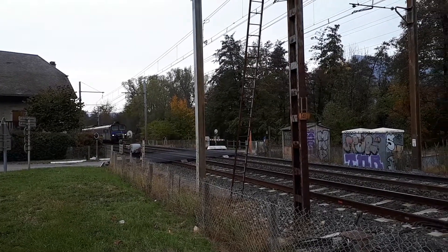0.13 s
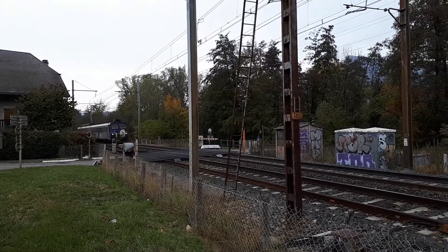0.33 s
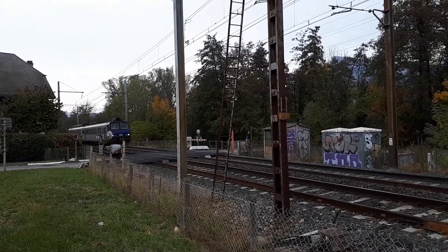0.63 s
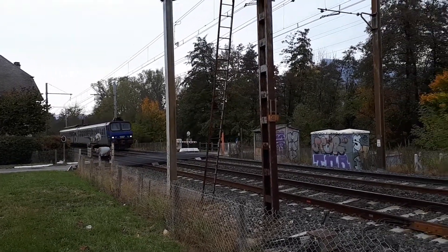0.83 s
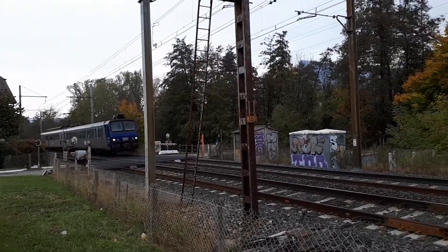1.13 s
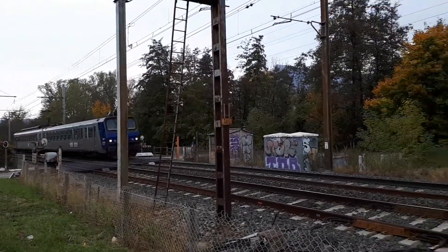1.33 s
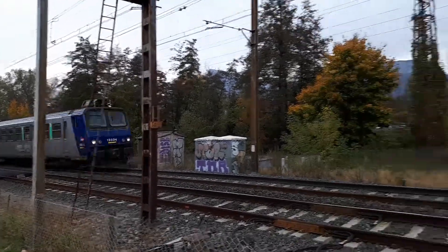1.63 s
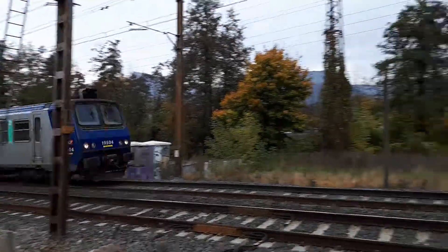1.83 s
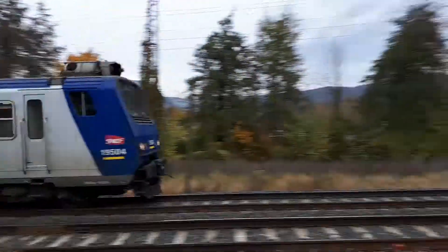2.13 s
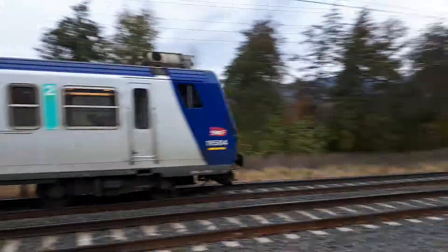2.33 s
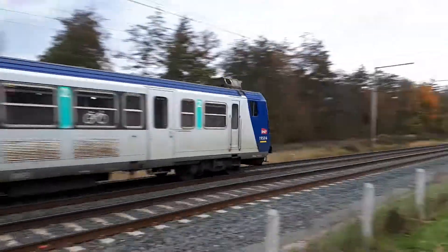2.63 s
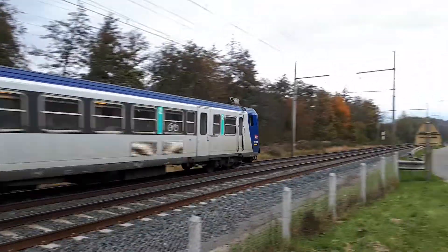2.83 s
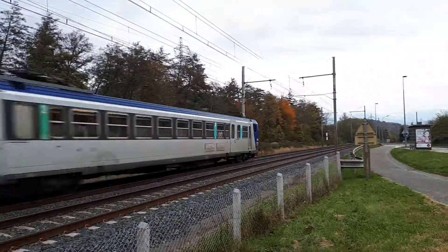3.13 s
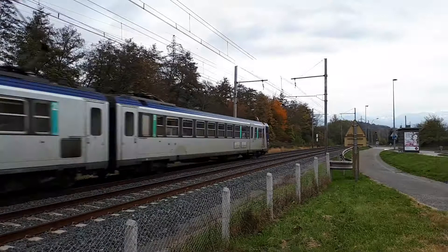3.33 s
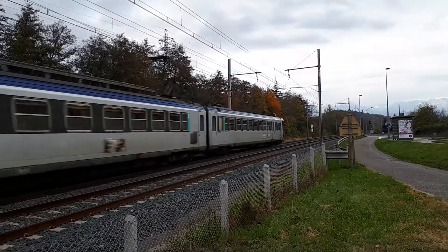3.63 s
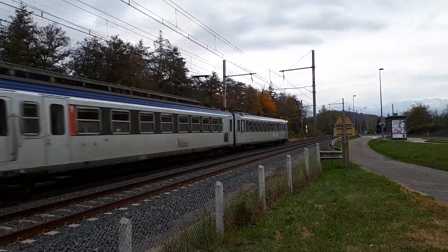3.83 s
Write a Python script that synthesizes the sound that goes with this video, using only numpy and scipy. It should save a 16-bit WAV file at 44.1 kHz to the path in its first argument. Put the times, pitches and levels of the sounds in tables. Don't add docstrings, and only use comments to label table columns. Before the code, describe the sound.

An electric train approaches outdoors with a swelling wheel roar and faint rail singing, gives one short loud horn note as it arrives, then rushes past and away; close lineside stereo microphones.

```python
import sys
import numpy as np
from scipy import signal
from scipy.fft import rfft, irfft
from scipy.io import wavfile

SR = 44100
rng = np.random.default_rng(int(sys.argv[2]) if len(sys.argv) > 2 else 0)


def unload_audio(sound):
    columns = np.transpose(np.atleast_2d(sound))
    steps = np.round(np.clip(columns, -1, 1) * 32767)
    wavfile.write(sys.argv[1], SR, steps.astype(np.int16))


def linear_from_db(decibels):
    return 10 ** (np.asarray(decibels, float) / 20)


N = 176400

# (time [s], level [dB], position [0 far, 1 abreast, 2 going away], left leads right [samples])
PASSING = [(0, -26, 0, 4.8), (.5, -23.5, 0.14, 6), (1.1, -19, 0.11, 7.5), (1.4, -14.5, 0.063, 6.1),
           (1.7, -11.5, 0.12, 8.5), (2.2, -15.5, 1.2, 8.56), (2.35, -13.5, 1.5, 18), (2.55, -16, 1, 20),
           (2.75, -17, 1.5, 19.3), (3.05, -16.5, 1.12, 22), (3.15, -20, 1.42, 20), (3.3, -21, 1.93, 19),
           (3.55, -17.5, 1.63, 19.7), (3.8, -19.5, 1.7, 19.7), (3.9, -19, 2.06, 20), (4, -20, 2.7, 17.4)]
# (frequency [Hz], density [dB per Hz])
ROAR_FAR = [(25, -31), (150, -4.5), (320, -15), (480, -8), (1150, -7), (1600, -13.5), (2000, -16.5),
            (15700, -53.5)]
# (frequency [Hz], density [dB per Hz])
ROAR_ABREAST = [(15, -54), (25, -22.5), (291, -15), (472, -15.5), (602, -10), (653, -7.5), (1870, -8.5),
                (2730, -15), (15700, -31.5)]
# (frequency [Hz], density [dB per Hz])
ROAR_AWAY = [(15, -57), (25, -22), (144, -10), (586, -4), (727, -11.5), (810, 7), (1180, -11), (1870, -10),
             (15700, -43.5)]
# (start [s], end [s], start pitch [Hz],
# end pitch [Hz], level over the roar [dB])
SINGING = [(-.5, 1.56, 479, 474, -10), (-.5, 2.0, 1066, 1045, -9.5), (3.5, 3.9, 160, 130, -13),
           (0.1, .55, 72, 62, -15), (-.3, 1.7, 1140, 1120, -13.5), (3.33, 3.68, 832, 808, 0.5),
           (3.64, 3.86, 815, 800, -2), (3.82, 4.15, 810, 800, -1), (3.1, 3.42, 890, 835, -10),
           (3.76, 4.0, 595, 580, -6), (2.94, 3.13, 1800, 1750, -7.5), (3.62, 3.9, 1900, 1860, -11),
           (2.95, 3.04, 900, 890, -7)]
# (start [s], end [s], start pitch [Hz], end pitch [Hz], level over the roar [dB])
RINGING = [(-1, 2.2, 1090, 1000, -8), (2.5, 3.2, 1990, 1810, -8.5), (2, 2.9, 1800, 2100, -7),
           (3.5, 3.7, 1500, 1900, -11), (2.5, 4.1, 1700, 1620, -4.5), (3.5, 5.5, 1040, 960, -14.5),
           (2, 2.75, 1030, 1100, -5), (2.5, 2.9, 850, 800, -10.5), (3.5, 4.5, 520, 460, -10.5),
           (0.2, 2.2, 1950, 1900, -21.5), (1.4, 2.0, 1450, 1400, -10.5), (-1.5, 2.3, 2700, 2650, -25.5),
           (3, 4.5, 1900, 2000, -15)]
# (time [s], peak level [dB], pitch [Hz])
JOINTS = [
    (0.884, -15.5, 1045),
    (1.357, -14.5, 1040),
    (3.215, -17, 880),
    (3.806, -13, 602),
]
# (time [s], spread [s], level [dB])
ROOF_PUFFS = [
    (2.736, 0.13, -24),
    (2.82, 0.18, -35.5),
    (3.27, 0.16, -38.5),
    (3.73, 0.016, -58),
    (2.53, 0.084, -44),
    (2.4, 0.095, -40),
]
# (frequency [Hz], density [dB per Hz])
ROOF_COLOUR = [(1470, -43), (2500, -28), (3510, -15), (4320, 2.5), (5360, -20), (7690, 8.5), (8830, -7),
               (12300, 6.5), (15700, -5)]
# (time [s], pitch [Hz], 1st to 5th partial [dB] as the ground echo shifts,
# upper partials [dB], 1st partial left minus right [dB])
HORN_NOTE = [
    (1.715, 710.5, -15.5, -8.5, -26, -25, -28, -3, 6.5),
    (1.745, 706.4, -14.5, -7, -22.5, -27, -29, -3, 11),
    (1.81, 697.3, -18, -18, -27, -18.5, -26, 3.5, 3),
    (1.895, 699.3, -13, -15.5, -32, -30, -33, -9, -13.5),
    (1.94, 695.6, -11.5, -10.5, -24, -15.5, -20.5, -0.5, -2.5),
    (2.04, 683.5, -12.5, -12.5, -29, -21, -29, 0.5, -12.5),
    (2.13, 677.8, -28.5, -18.5, -18.5, -32, -21.5, 2.5, 1),
    (2.19, 672.6, -31, -12, -15.5, -24, -32, -5.5, -6),
    (2.28, 670, -19, -16.5, -19.5, -36, -38.5, -18, -1),
]
# (multiple of pitch [1], level [dB])
UPPER_PARTIALS = [(6, -19), (7, -19.5), (8, -21), (9, -20.5), (10, -23), (11, -20.5), (12, -23), (13, -32),
                  (14, -24.5), (15, -27), (16, -28), (17, -24.5), (18, -33), (19, -32), (20, -29),
                  (21, -39), (22, -35)]
RIGHT_AHEAD = [0.04, 0.27, 1.77, 1.24]
# (start [s], end [s], pitch [Hz], level [dB])
ECHOES = [
    (2.04, 2.34, 625, -25),
    (2.26, 2.54, 602, -24),
    (2.2, 2.44, 680, -27),
    (2.25, 2.39, 2135, -30),
    (2.26, 2.4, 1418, -36),
]
# (frequency [Hz], density [dB per Hz])
LEAF_COLOUR = [(5500, -37), (7000, 4), (8200, 5), (9000, -12), (11500, 2), (13000, -12), (15700, -20)]
# (frequency [Hz], level [dB])
LEAF_STRIPS = [
    (7700, -54.5),
    (11500, -65),
]
# (frequency [Hz], left-right likeness [0 to 1])
MIC_LIKENESS = [(30, 0.98), (200, 0.97), (400, 0.92), (700, 0.65), (2000, 0.15), (6000, 0.13),
                (15000, 0.095)]
# (frequency [Hz], left minus right [dB])
MIC_BALANCE = [(60, -0.5), (240, 0), (950, 0.5), (2000, -1), (4000, 3.5), (15000, 5)]
# (frequency [Hz], gain [dB])
MIC_COLOUR = [(1250, 0.5), (1560, -4.5), (1900, 0.5), (6500, 0), (8000, 2), (9000, -5.5), (12000, -1),
              (15700, -3.5)]

HORN_ON_S, HORN_OFF_S = 1.696, 2.283


def rolling(bands):
    level_db, place, _ = in_time(PASSING)
    together = drift(6)
    roar = 0
    for hz, band in bands:
        colours = [at_hz(s, hz) for s in (ROAR_FAR, ROAR_ABREAST, ROAR_AWAY)]
        colour_db = np.interp(place, np.arange(3), colours)
        patchy_db = 1.02 * (0.21 * together + drift(13.6))
        roar = roar + band * linear_from_db(colour_db + patchy_db)
    return linear_from_db(level_db + recorder_gain_db()) * (roar * 5.14 + singing_steel())


def singing_steel():
    out = 0
    for rows, width_hz, steady in [(SINGING, 19.4, 1.6), (RINGING, 102, 0)]:
        for start, end, hz0, hz1, db in rows:
            out = out + linear_from_db(db) * swell(start, end, hz0, hz1, width_hz, flicker_db=2.5, steady=steady)
    return out


def knocks():
    out = np.zeros(N)
    for s, db, hz in JOINTS:
        t = np.maximum(clock() - s, 0)
        out += linear_from_db(db + 2.5 - 60 * t / 0.07) * np.sin(2 * np.pi * hz * t)
    return out


def roof_gear(bands):
    puffs = sum(linear_from_db(db - 4.4 * ((clock() - s) / spread) ** 2) for s, spread, db in ROOF_PUFFS)
    puffs = puffs * linear_from_db(0.7 * drift(19))
    return puffs * rms_one(coloured(bands, ROOF_COLOUR))


def horn():
    begin, size = int(HORN_ON_S * SR), SR * 2 // 3
    hz, *lower, upper, pan_db = [c[begin:begin + size] for c in in_time(HORN_NOTE)]
    t = np.arange(size) / SR
    hz = hz + 45.4 * np.exp(-t / 0.01395)
    turn = 2 * np.pi * np.cumsum(hz) / SR
    release = np.clip((HORN_OFF_S - HORN_ON_S - t) / 0.02 + 1, 0, 1)
    out = 0
    for k, db in list(enumerate(lower, 1)) + UPPER_PARTIALS:
        level_db = db if k < 6 else db - 10.5 + upper * min(1, k / 9)
        ahead = np.array([[0], [RIGHT_AHEAD[int(k) - 1] if k < 5 else 0]])
        shared = drift(20, size)
        fade_db = 3.0 * min(1, k / 6)
        sides = np.array([linear_from_db(fade_db * (0.8 * shared + 1.14 * drift(20, size))) for _ in range(2)])
        wander = 0.034 * k * drift(33, size)
        line = np.sqrt(2) * np.sin(k * turn + wander + rng.uniform(0, 1) + ahead)
        line = line + linear_from_db(-18 + 1.05 * k) * narrow(k * hz, 80)[0]
        gate = np.clip((t - 0.007 * (k > 1)) / 0.0058, 0, 1) * release
        balance_db = (k == 1) * pan_db * np.array([[.5], [-.5]])
        out = out + gate * linear_from_db(level_db + balance_db) * sides * line
    high = signal.butter(2, 5500, "high", fs=SR, output="sos")
    rasp = pair(*signal.sosfilt(high, rng.standard_normal((2, size))), 8000)
    out = out + gate * linear_from_db(-34 + upper) * (1 + 1.6 * np.sin(turn)) * rasp
    out = np.pad(out, ((0, 0), (begin, N - begin - size)))
    return out + linear_from_db(-11) * scattered(out) + horn_returns()


def scattered(sound):
    size = SR * 2 // 3
    t = np.arange(size) / SR
    tail = rng.standard_normal((2, size)) * linear_from_db(-60 * t / 0.45) * (t > 0.012)
    tail = tail / np.sqrt(np.sum(tail ** 2, axis=1, keepdims=True))
    return signal.fftconvolve(sound, tail, axes=1)[:, :N]


def horn_returns():
    return sum(linear_from_db(db) * swell(start, end, hz, hz, 12.1, 0, steady=1.6) for start, end, hz, db in ECHOES)


def leaves(bands):
    strips = sum(linear_from_db(db) * swell(-8, 7.3, hz, hz, 450, 0) for hz, db in LEAF_STRIPS)
    hiss = linear_from_db(-61.5) * rms_one(coloured(bands, LEAF_COLOUR))
    return linear_from_db(recorder_gain_db()) * (strips + hiss)


def recorder_gain_db():
    t = clock() - HORN_ON_S
    hold_s = 0.029
    fast = -13 * np.clip(t / 0.0096, 0, 1) + 11.5 * np.maximum(t - hold_s, 0)
    slow = -5 + 5.5 * (clock() - HORN_OFF_S)
    return np.where(t > hold_s, np.minimum(np.minimum(fast, slow), 0), fast)


def noise_bands():
    edges = 25 * 2 ** np.arange(0, 9.4, 1 / 3)
    white = rng.standard_normal((2, 2, N))
    bands = []
    for k, (low, high) in enumerate(zip(edges, edges[1:])):
        hz = np.sqrt(low * high)
        sos = signal.butter(2, [low, high], "band", fs=SR, output="sos")
        bands.append((hz, pair(*signal.sosfilt(sos, white[k % 2]), hz)))
    return bands


def coloured(bands, spectrum):
    return sum(band * linear_from_db(at_hz(spectrum, hz)) for hz, band in bands if hz > spectrum[0][0])


def swell(start, end, hz0, hz1, width_hz, flicker_db, steady=0):
    first = max(int(start * SR), 0)
    s = clock()[first:int(end * SR)]
    hz = np.interp(s, [start, end], [hz0, hz1])
    rise_fall = np.sin(np.pi * (s - start) / (end - start))
    flicker = linear_from_db(flicker_db * drift(4.3, len(s)))
    band = rise_fall * flicker * pair(*narrow(hz, width_hz, count=2, steady=steady), hz0)
    return np.pad(band / np.sqrt(2), ((0, 0), (first, N)))[:, :N]


def narrow(hz, width_hz, count=1, steady=0):
    turn = 2 * np.pi * np.cumsum(hz) / SR
    cos, sin = np.cos(turn), np.sin(turn)
    noises = []
    for k in range(count):
        in_phase = drift(width_hz, len(hz)) + steady * (k == 0)
        noise = in_phase * cos + drift(width_hz, len(hz)) * sin
        noises.append(noise / np.sqrt(1 + steady ** 2 / 2))
    return noises


def pair(mid, side, hz):
    alike = np.clip(at_hz(MIC_LIKENESS, hz), 0, 1)
    balance = linear_from_db(at_hz(MIC_BALANCE, hz) * np.array([[.5], [-.5]]))
    return balance * (np.sqrt(1 + alike) * mid + np.sqrt(1 - alike) * side * [[1], [-1]])


def drift(rate_hz, size=N):
    r = np.exp(-80 * np.pi * rate_hz / SR)
    draws = rng.standard_normal(N // 40 + 1002)
    slow = signal.lfilter([1], [1, -2 * r, r * r], draws)[1000:]
    return np.interp(np.arange(size) / 40, np.arange(len(slow)), rms_one(slow))


def clock():
    return np.arange(N) / SR


def rms_one(x):
    return x / np.sqrt(np.mean(x ** 2) + 1e-20)


def in_time(rows):
    s, *columns = np.transpose(rows)
    return [np.interp(clock(), s, c) for c in columns]


def at_hz(points, hz):
    table_hz, value = np.transpose(points)
    return np.interp(np.log(hz), np.log(table_hz), value)


def scene():
    bands = noise_bands()
    left, right = rolling(bands) + knocks() + roof_gear(bands) + horn() + leaves(bands)
    low = signal.sosfiltfilt(signal.butter(3, 1180, fs=SR, output="sos"), right)
    lag, n = in_time(PASSING)[2], np.arange(N)
    late_high = np.interp(n - np.round(lag), n, right - low)
    late_low = np.interp(n - 0.68 * lag, n, low)
    return np.array([left, late_high + late_low])


def roll_off(x):
    return signal.sosfilt(signal.butter(12, 15880, fs=SR, output="sos"), x)


def record(dry):
    hz = np.maximum(np.arange(N // 2 + 1) * SR / N, 1)
    x = irfft(rfft(dry) * linear_from_db(at_hz(MIC_COLOUR, hz)), N)
    x = x / (1 + (x / 0.8) ** 6) ** (1 / 6)
    x = signal.sosfilt(signal.butter(3, 48, "high", fs=SR, output="sos"), x)
    return roll_off(x)


dry = scene()
out = record(dry)
unload_audio(out)
```